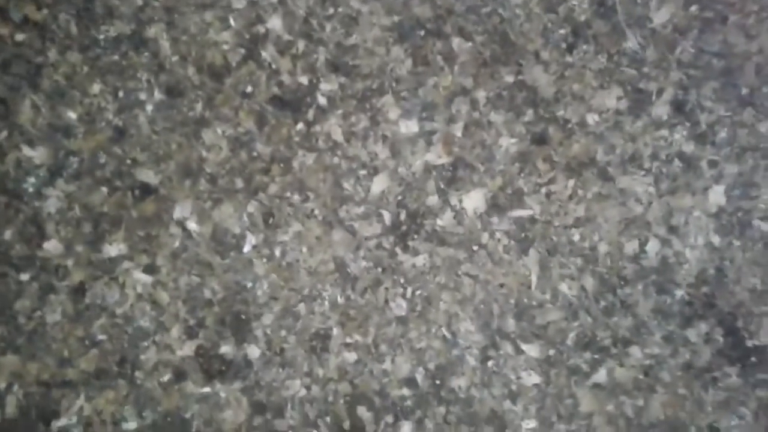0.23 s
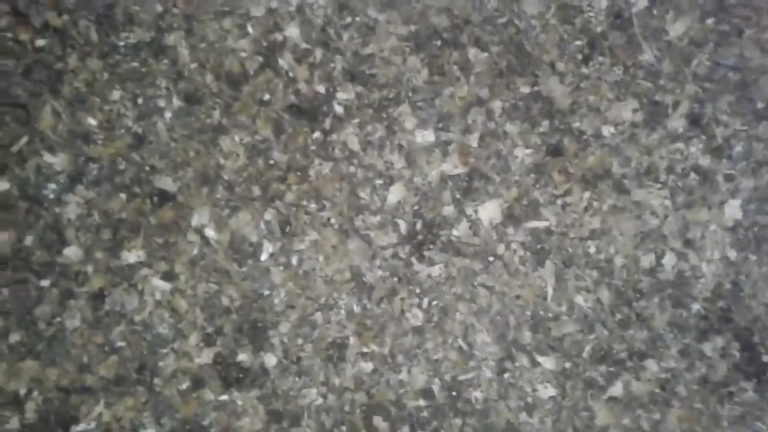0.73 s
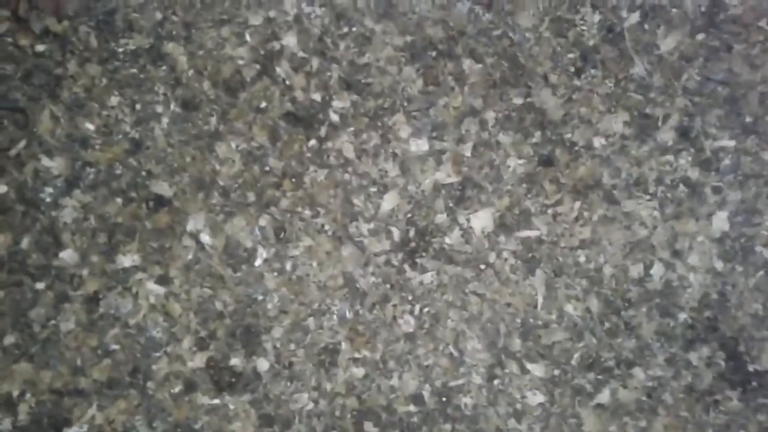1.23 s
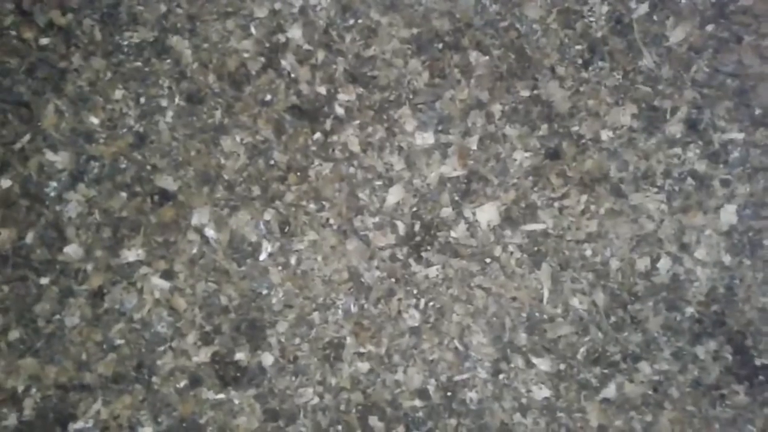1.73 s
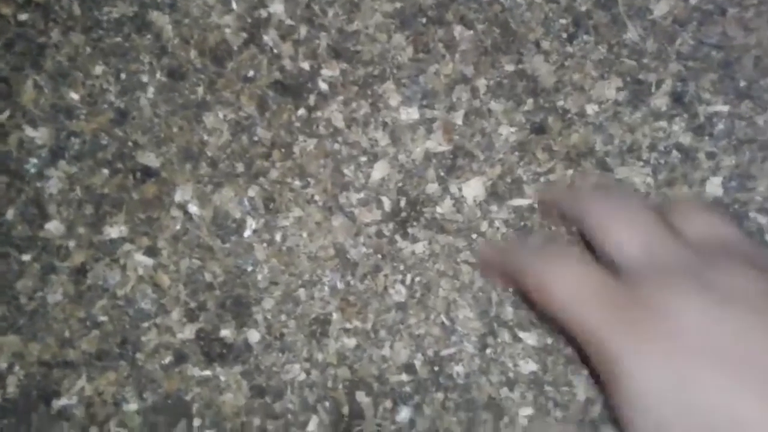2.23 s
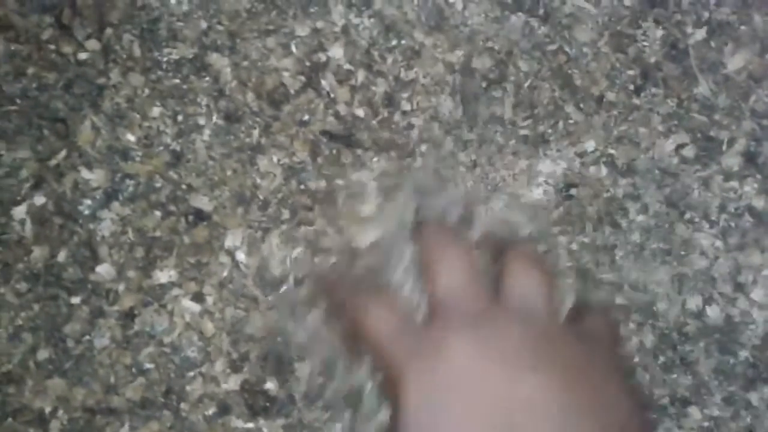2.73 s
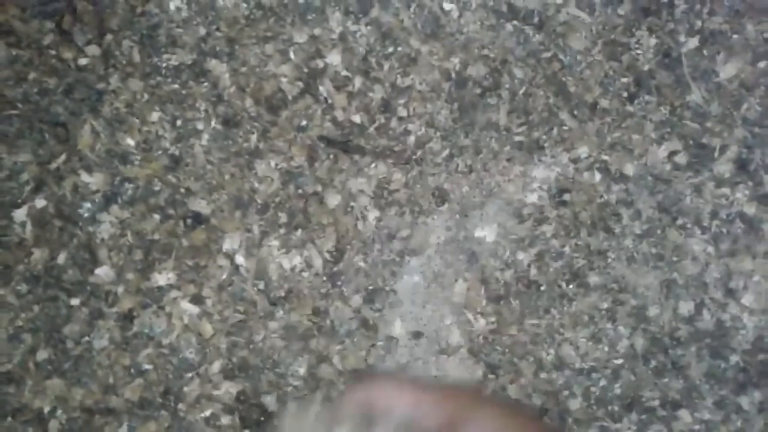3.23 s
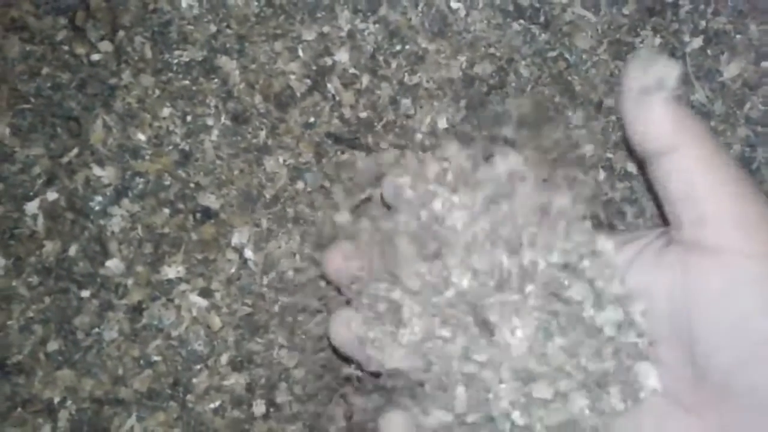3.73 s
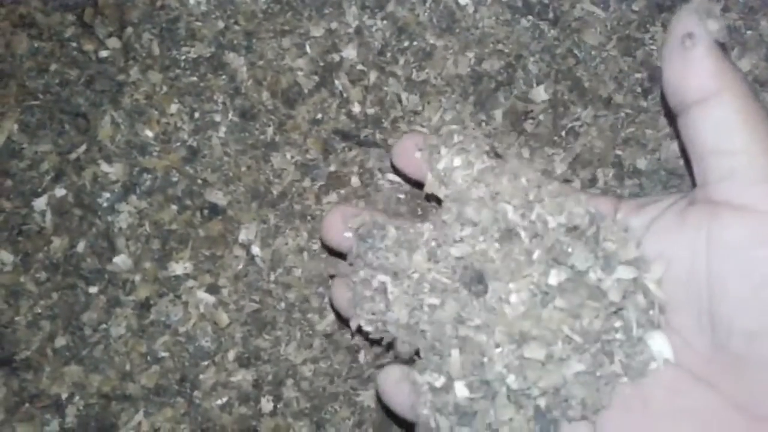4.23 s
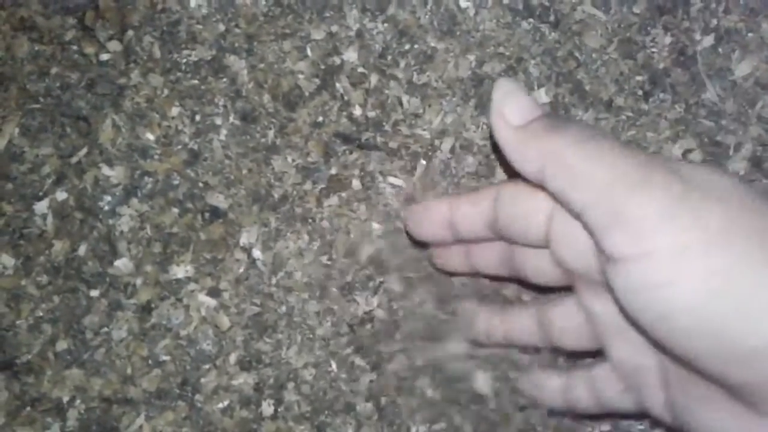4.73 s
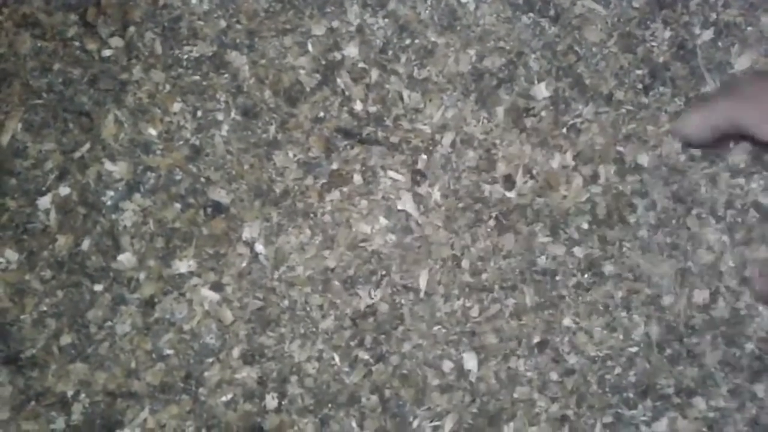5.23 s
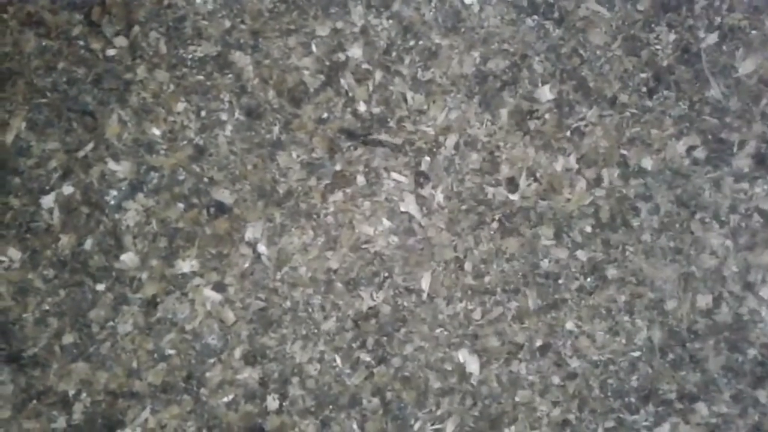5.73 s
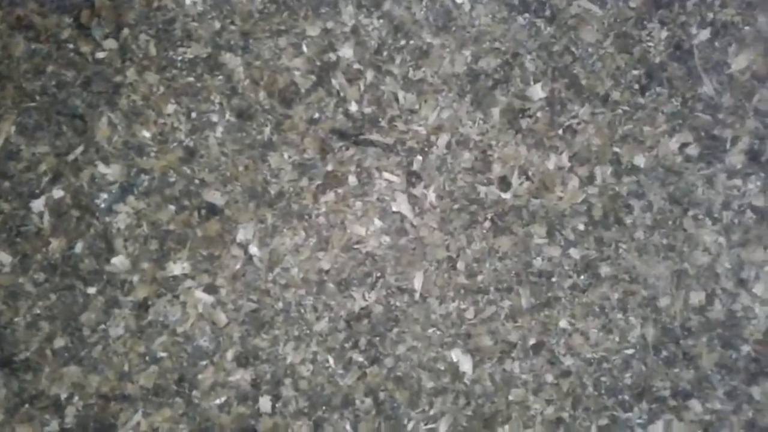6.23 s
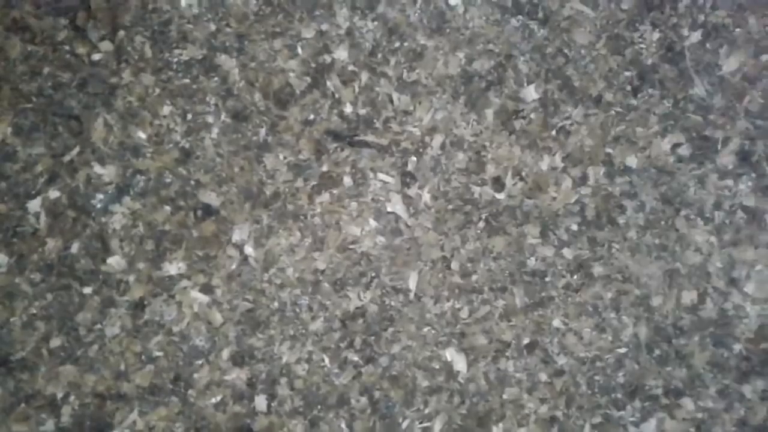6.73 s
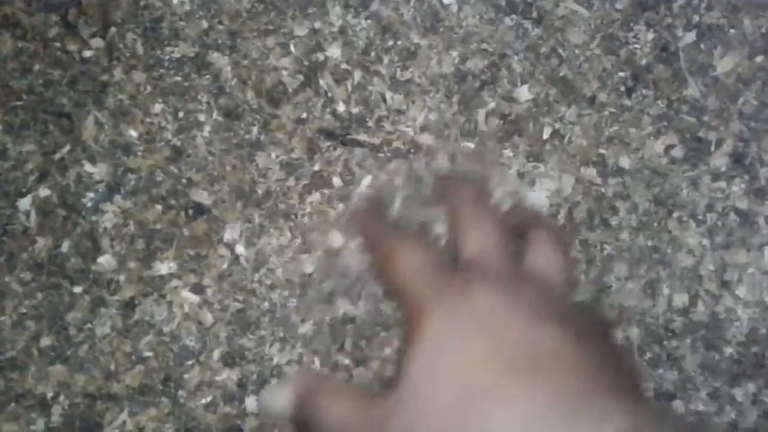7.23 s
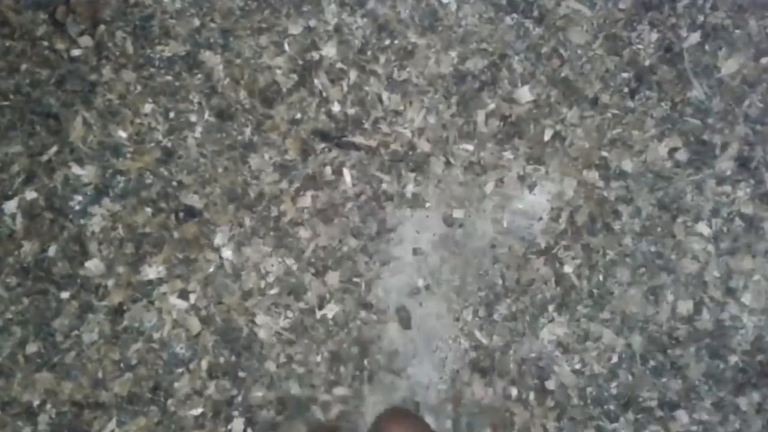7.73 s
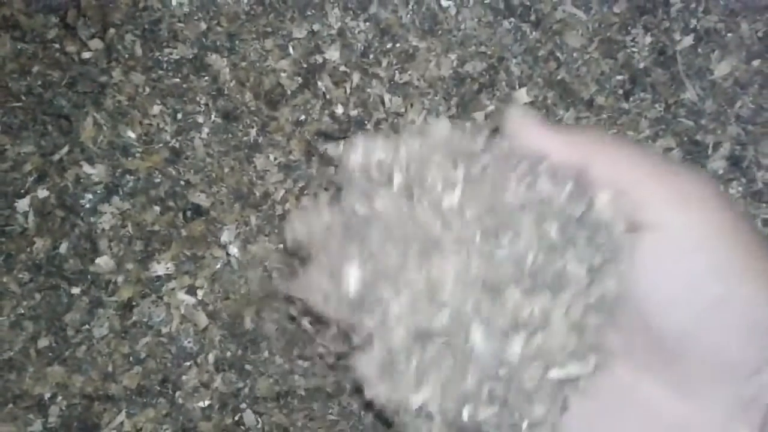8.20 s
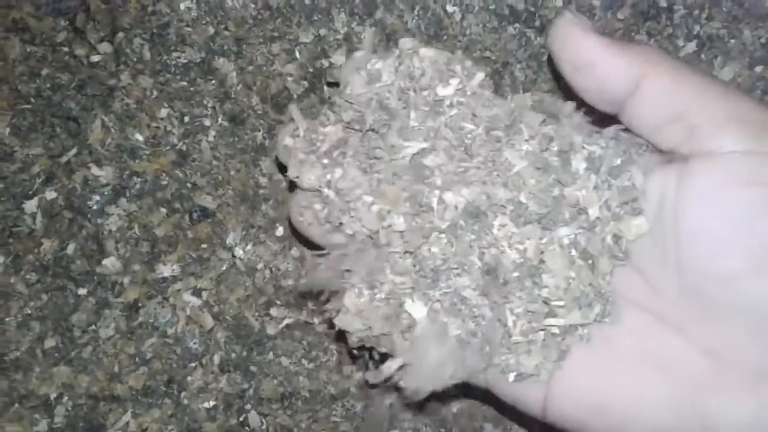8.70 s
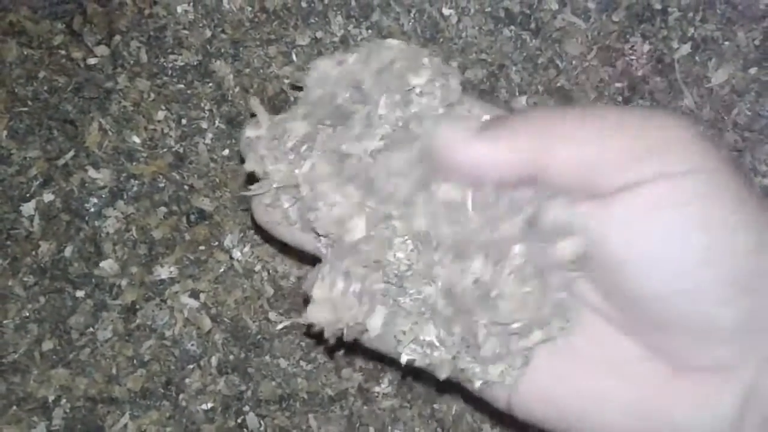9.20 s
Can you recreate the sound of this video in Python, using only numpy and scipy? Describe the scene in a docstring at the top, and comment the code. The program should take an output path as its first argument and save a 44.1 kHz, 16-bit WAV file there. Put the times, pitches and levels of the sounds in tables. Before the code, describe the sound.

Big ventilation fans throb and whirr steadily in a closed poultry shed while many young chickens peep, squeal and trill, with faint ticks of dry litter.

```python
"""Closed poultry shed with fans and chickens

Inside the shed, big fans throb as blade tones of nearly equal pitch beat, over hum, whirr and rushing air.
Close to the microphone young chickens peep, cry, squeal and trill: swept whistles, some shaken or dipping.
A few steps away others peep softly, and the distant flock merges into a wash of calls and shaped noise.
A hand scoops dry litter: crumbs patter and a few flakes tick as short bursts of bright noise.
Near calls are dulled above 3 kHz but for a band near 5 kHz; the microphone adds faint hiss and whines."""
import sys
import numpy as np
from scipy import signal
from scipy.fft import rfft, irfft
from scipy.io import wavfile
from scipy.ndimage import uniform_filter1d

SR = 44100
rng = np.random.default_rng(int(sys.argv[2]) if len(sys.argv) > 2 else 0)


def dump(signal):
    """Clip the signal to [-1, 1] and save it as 16-bit WAV at the path in sys.argv[1]."""
    limited = np.clip(np.atleast_2d(signal).T, -1, 1)
    pcm = np.round(limited * 32767).astype(np.int16)
    wavfile.write(sys.argv[1], SR, pcm)


N = 417186
TIME, BINS = np.arange(N) / SR, np.fft.rfftfreq(N, 1 / SR)  # sample times [s], spectrum bins [Hz]

# All levels are relative; the functions add their own gains.
# blade tones of five fans at nearly the same speed: (pitch [Hz], level [dB])
FAN_BLADES = [(42.935, -23.4), (42.72, -29.5), (41.31, -28.7), (41.025, -36), (38.81, -30.5)]
IN_STEP_S = 4.55  # moment when all blade tones are in phase [s]
# slow swell of the blade tones: (time [s], level [dB])
BLADE_SWELL = [(0, -1.5), (2.0, -0.5), (2.6, 5.5), (3.2, 1.5), (5.5, -3.5), (6.3, 2), (7, -0.5),
               (7.7, -2.5), (8.2, 0.5), (8.8, 1.5), (9.46, -2.5)]
# spectrum of the air buffeting around the blades: (frequency [Hz], density [dB per Hz])
BUFFET_SPECTRUM = [(12, -30), (30, -19), (38, -7.5), (42, 19), (45, -23), (52, -24), (120, -120)]
HUM_HZ = 82.05  # octave of the blade tones
# hum that comes and goes: (time [s], level [dB])
HUM_SWELL = [(0, -39), (.9, -25), (1.3, -46), (1.9, -27.5), (2.4, -23.5), (2.9, -38.5), (3.8, -24.5),
             (4.4, -30.5), (4.8, -23.5), (5.45, -25), (6, -33), (7.1, -26.5), (7.9, -43), (8.6, -20.5),
             (9, -30), (9.46, -24)]
# two close tones of the motors' whirr: (pitch [Hz], width [Hz], level [dB])
WHIRR_TONES = [(769.5, 26, -38), (790, 20, -40)]
# swell of the whirr: (time [s], level [dB])
WHIRR_LEVEL = [(0, -2.5), (1.5, 2.5), (2.38, -9), (2.55, 6.5), (2.75, -5.5), (3.4, 2), (4.45, -0.5),
               (4.63, 5.5), (4.85, 0), (5.4, 3), (5.7, -3), (6.8, 0.5), (7.1, 2), (8.5, 1), (8.72, 7.5),
               (9, 3), (9.46, 0.5)]
# tones of fans, motors and housings: (pitch [Hz], width [Hz], level [dB])
HOUSING_TONES = [(100.6, 2.9, -40.5), (118.5, 2, -35), (159.4, 2, -40), (312.2, 10.15, -46),
                 (494, 10, -44.5), (586.3, 6.26, -45.5), (662.5, 8.4, -49.5), (949, 14, -45),
                 (998, 8.02, -43), (1060, 5.5, -48.5), (1056, 14.2, -58), (1203, 7.94, -47),
                 (1317, 16.6, -47), (1479, 24, -51.5), (1540, 4.75, -54)]
# strength of the air stream: (time [s], level [dB])
AIR_STREAM = [(0, -25.5), (2.2, -27), (2.7, -25.5), (4.7, -26), (6.2, -26.5), (8.8, -25)]
# spectrum of the low rumble of moved air: (frequency [Hz], density [dB per Hz])
RUMBLE_SPECTRUM = [(12, -36), (25, -46), (36, -13), (55, -4.5), (75, -1), (100, 0), (132, 0), (165, -5.5),
                   (195, -8), (240, -12), (290, -20), (400, -50), (700, -91)]
# spectrum of the rush of moved air: (frequency [Hz], density [dB per Hz])
RUSH_SPECTRUM = [(120, -39), (270, -8.5), (338, -7), (370, -3.5), (620, -4), (860, -2.5), (1000, 0.5),
                 (1190, -4), (1380, -11.5), (1600, -14), (2100, -16), (2500, -19), (2900, -33), (3400, -41),
                 (4500, -64)]

# near peeps: (time [s], length [s], middle pitch [Hz], fall [octaves], level [dB])
NEAR_PEEPS = [(0.436, 0.045, 2480, 0.19, -34), (0.666, 0.036, 2045, .12, -33),
              (1.297, .035, 1850, 0.16, -33), (1.362, .028, 2200, .1, -35), (1.526, 0.052, 2430, 0.21, -32),
              (1.665, 0.03, 1415, 0.11, -30), (1.941, 0.043, 1950, 0.36, -29),
              (2.052, .024, 2460, .05, -35), (2.407, 0.032, 2300, .52, -29),
              (2.519, 0.032, 1970, 0.23, -32), (2.56, 0.035, 2090, 0.13, -31),
              (2.684, 0.032, 1907, 0.43, -26.5), (2.965, .02, 2780, .08, -44),
              (3.031, .024, 2200, .28, -32), (3.168, .05, 2210, 0.19, -34), (3.376, 0.023, 2360, 0.28, -34),
              (3.458, 0.046, 2840, 0.15, -39), (3.51, .02, 1775, .15, -34), (3.536, 0.02, 2010, .2, -29),
              (3.823, 0.026, 2330, 0.29, -32), (3.829, .028, 1730, .05, -30), (3.968, .022, 1930, .15, -38),
              (4.038, 0.03, 2440, 0.33, -33), (4.048, 0.032, 1683, 0.21, -27),
              (4.083, 0.012, 1570, .1, -27), (4.169, .016, 1450, .05, -28), (4.236, 0.026, 1910, 0.16, -23),
              (4.248, 0.038, 2145, 0.019, -29), (4.369, 0.032, 1327, 0.11, -24),
              (4.44, 0.024, 2224, .06, -32), (4.59, .024, 1990, .1, -31), (4.914, .03, 1350, .12, -29),
              (5.156, .026, 1414, .1, -31), (5.995, 0.024, 1830, .2, -30), (6.152, .025, 1880, 0.29, -27.5),
              (6.3, 0.03, 1854, 0.29, -25), (6.495, .05, 2850, 0.25, -46), (7.09, .035, 2780, 0.26, -42.5),
              (7.245, .025, 3020, .12, -44), (7.428, 0.047, 1814, 0.19, -32.5),
              (7.609, 0.015, 2190, 0.2, -31), (7.849, .02, 2170, 0.25, -29.5),
              (7.905, 0.019, 2600, .05, -30), (8.099, 0.049, 1860, 0.22, -31),
              (8.143, 0.016, 1890, 0.1, -25), (8.267, 0.026, 1870, 0.24, -28),
              (8.363, 0.036, 2650, 0.22, -41), (8.85, 0.02, 1560, .2, -28)]
PEEP_EASE = 0.17  # how much a peep's fall flattens towards its end
# hoarse squeals, mostly near, a few from farther off: (time [s], length [s], pitch [Hz], pitch scatter [Hz],
# level [dB])
HOARSE_SQUEALS = [(2.686, 0.091, 2120, 300, -40.5), (3.814, 0.073, 2360, 180, -41),
                  (4.043, 0.03, 1686, 130, -31), (4.228, 0.095, 2030, 200, -34),
                  (4.362, 0.045, 1410, 110, -35), (7.917, 0.025, 1990, 90, -32.5),
                  (8.134, .028, 2020, 190, -36), (8.895, 0.028, 1990, 171, -33),
                  (8.985, 0.035, 2020, 150, -35), (7.885, .075, 2890, 200, -39),
                  (7.993, .056, 2764, 160, -38.5), (4.44, 0.041, 2180, 130, -40)]
# closest cries that arch, slide down or swoop, one list each: (time [s], pitch [Hz], level [dB])
NEAR_CRIES = [
    [(3.062, 2950, -42), (3.078, 3050, -48), (3.093, 2650, -41), (3.102, 2370, -29), (3.122, 2110, -26),
     (3.138, 2060, -27), (3.162, 1660, -33)],
    [(3.267, 2150, -29), (3.28, 2870, -41), (3.297, 2850, -42), (3.31, 2390, -28), (3.327, 1730, -27)],
    [(3.706, 2020, -29), (3.732, 2620, -38), (3.743, 2320, -30), (3.768, 2080, -25), (3.785, 1970, -29),
     (3.796, 1660, -32)],
    [(3.868, 2320, -35), (3.882, 2190, -29), (3.897, 1920, -35), (3.909, 1750, -28), (3.932, 1740, -34)],
    [(4.762, 1370, -24), (4.784, 1500, -17.5), (4.808, 1420, -25), (4.835, 1280, -27)],
    [(8.359, 3900, -41), (8.369, 3420, -46), (8.376, 1700, -42), (8.386, 1390, -24), (8.391, 1250, -23),
     (8.396, 1720, -34), (8.406, 1780, -31)],
    [(8.506, 4350, -32), (8.522, 3500, -43), (8.535, 2930, -46), (8.553, 2440, -37), (8.568, 2080, -26),
     (8.606, 1860, -22), (8.62, 1540, -28), (8.636, 1470, -24)],
    [(8.949, 2860, -33), (8.967, 2120, -22), (8.974, 1750, -21), (8.982, 1675, -24), (8.99, 2110, -25),
     (8.998, 2350, -30)],
    [(8.962, 1500, -33), (8.97, 2050, -28), (8.977, 2700, -30)],
]
# trills near and far: (time [s], length [s], upper pitch [Hz], dip depth [Hz], dip rate [per s],
# level [dB], echo over direct sound [dB])
TRILL_CALLS = [(3.66, 0.06, 2260, 230, 33, -32, -7), (4.949, 0.118, 2200, 320, 36, -31.5, -10),
               (7.872, .062, 3020, 380, 33, -35, -3), (7.914, 0.048, 3230, 330, 48, -36.5, -3),
               (7.982, 0.105, 2930, 300, 45, -40.5, -1), (8.598, .232, 2460, 380, 43.3, -28.8, -12),
               (9.11, .05, 2620, 220, 44, -40, -4), (9.388, .05, 2620, 200, 44, -36, -4)]
TRILL_SAG, TRILL_DEEPEN = 0.08, 0.65  # shares by which the pitch sinks and the dips deepen over a trill
# tone of the near calls and trills, dulled above 3 kHz, with a bright band near 5 kHz:
# (frequency [Hz], gain [dB])
CALL_TONE = [(2900, 0.5), (3200, -6.5), (3500, -7.5), (4000, -22), (4900, -4), (6000, -42)]

# ticks of falling litter flakes: (time [s], level [dB], lower edge [Hz])
FLAKE_TICKS = [(2.685, -47, 5000), (3.271, -51, 5000), (4.147, -48, 7000), (4.21, -49.1, 7000),
               (4.232, -51, 2500), (4.254, -52, 2500), (4.277, -51, 3000), (4.296, -48, 5000),
               (4.363, -41, 4200), (9.037, -46, 6500), (9.114, -44, 5000)]
# colour of the ticks: (frequency [Hz], gain [dB])
FLAKE_COLOUR = [(1500, -4), (3500, 11), (5500, 9), (8000, 8.5), (10500, 10), (12000, -6), (16000, -33)]
# litter sliding off the palm: (time [s], level [dB])
PALM_RUSTLE = [(4.19, -90), (4.23, -58), (4.26, -56), (4.3, -61), (4.36, -77), (4.42, -90)]
# colour of that rustle: (frequency [Hz], density [dB per Hz])
PALM_COLOUR = [(1500, -13), (2800, 3), (3600, 9), (5000, -3), (10000, -18), (14000, -35)]

# spectrum of the distant flock: (frequency [Hz], density [dB per Hz])
FLOCK_SPECTRUM = [(1000, -52), (1600, -1.5), (2000, 0.5), (2300, 1), (2600, -5.5), (2900, -8.5),
                  (3200, -17), (3700, -30.5), (5000, -62)]
# the flock settles a little after two seconds: (time [s], level [dB])
FLOCK_SWELL = [(0, -36.5), (2.05, -36), (2.3, -39), (3.8, -38), (4.7, -40), (6.6, -39), (9.46, -38.5)]

# spectrum of the microphone hiss: (frequency [Hz], density [dB per Hz])
HISS_SPECTRUM = [(1500, -17), (4000, -1), (6200, -3.5), (7600, -1.5), (8600, 0.5), (11000, -3), (12200, -9),
                 (13500, -23), (16000, -25)]
# strength of the hiss: (time [s], level [dB])
HISS_SWELL = [(0, -58.5), (2.15, -58.5), (2.6, -62.1), (5.1, -63.5), (5.8, -61.5), (9.46, -63)]
# thin whines of the microphone: (pitch [Hz], width [Hz], level [dB])
MIC_WHINES = [(7234, 8, -83), (10870, 70, -86), (14500, 50, -87)]
# noise of opposite sign in the two channels: (frequency [Hz], density [dB per Hz])
WIDTH_SPECTRUM = [(30, -3), (86, -11), (200, -18), (300, -1), (730, -6.5), (1250, -3.5), (2170, -1),
                  (2870, -6.5), (3430, -27), (4500, -30)]
EDGE_HZ = 15400  # upper band limit


def fans(buffet_db=-29, rumble_db=-22.0, rush_db=-1.0, gust_db=0.65):
    """Blade tones beat into a throb, with hum, motor tones, and the rumble and rush of driven air."""
    start = rng.random()  # shared phase [turns]
    blades = np.zeros(N)
    for hz, db in FAN_BLADES:
        blades += amp(db) * unit(np.sin(2 * np.pi * (hz * (TIME - IN_STEP_S) + start)))
    throb = follow(BLADE_SWELL) * blades + amp(buffet_db) * noise(BUFFET_SPECTRUM)
    hum = follow(HUM_SWELL) * tones([(HUM_HZ, 3, 0)], flutter=0.13)
    whirr = follow(WHIRR_LEVEL) * tones(WHIRR_TONES, flutter=0.96)
    housings = unit(follow(AIR_STREAM)) * tones(HOUSING_TONES, flutter=0.78)
    rumble = amp(rumble_db + gust_db * drift(9.1)) * noise(RUMBLE_SPECTRUM)
    rush = amp(rush_db) * follow(AIR_STREAM) * noise(RUSH_SPECTRUM)
    return throb + hum + whirr + housings + rumble + rush


def near_birds(peeps_db=-1.5):
    """The chickens closest to the microphone peep, squeal and cry; a few farther birds squeal hoarsely too."""
    out = np.zeros(N)
    for s, length, hz, fall, db in NEAR_PEEPS:
        add(out, s, amp(db + peeps_db) * peep(length, hz, fall))
    for s, length, hz, scatter_hz, db in HOARSE_SQUEALS:
        add(out, s, amp(db) * squeal(length, hz, scatter_hz))
    for curve in NEAR_CRIES:
        add(out, *cry(curve))
    return colour(out, CALL_TONE)


def peep(length, hz, fall):
    """A short whistle falls through its pitch, quickly at first and then more gently."""
    u = np.linspace(-.5, .5, max(int(length * SR), 64))
    pitch = hz * 2 ** (fall * (PEEP_EASE * u ** 2 - u))
    return signal.windows.tukey(len(u), .5) * whistle(pitch)


def squeal(length, hz, scatter_hz, shake_hz=330):
    """In a strained call, fast uneven shaking of the pitch breaks the whistle into a band."""
    size = max(int(length * SR), 64)
    band = signal.butter(2, [shake_hz / 2, shake_hz], "band", fs=SR, output="sos")
    shakes = signal.sosfilt(band, rng.standard_normal((2, SR // 4)))
    pitch_shake, level_shake = shakes[:, -size:]  # the end, where the filter has settled
    phase = 2 * np.pi * np.cumsum(hz + scatter_hz * unit(pitch_shake)) / SR
    call = unit((1 + unit(level_shake)) * voice(phase))
    return call * signal.windows.tukey(size, .5)


def cry(curve):
    """A whistle bends in pitch and strength along the curve; returned with its start [s]."""
    s, hz, db = np.transpose(curve)
    t = np.arange(s[0], s[-1], 1 / SR)
    call = amp(np.interp(t, s, db)) * whistle(np.interp(t, s, hz))
    return s[0], call * signal.windows.tukey(len(t), .2)


def whistle(hz, overtone_db=-22, quaver=0.012, quaver_hz=70):
    """A nearly pure tone follows a pitch line with a slight quaver."""
    t = TIME[:len(hz)]
    hz = hz * (1 + quaver * np.sin(2 * np.pi * (quaver_hz * t + rng.random())))
    phase = 2 * np.pi * np.cumsum(hz) / SR
    overtone = amp(overtone_db) / (1 + (hz / 1500) ** 10)  # fades out on high calls
    return np.sin(phase) + overtone * np.sin(2 * phase)


def voice(phase, overtone_db=-28):
    """A strained voice sounds the note and its octave."""
    return np.sin(phase) + amp(overtone_db) * np.sin(2 * phase)


def trills():
    """Birds trill near and far, blurred by the shed's echoes."""
    direct, echo = np.zeros((2, N))
    for s, length, top_hz, depth_hz, rate, db, echo_db in TRILL_CALLS:
        call = amp(db) * trill(length, top_hz, depth_hz, rate)
        add(direct, s, call)
        add(echo, s, amp(echo_db) * call)
    return colour(direct + shed(echo), CALL_TONE)


def trill(length, top_hz, depth_hz, rate, dip_db=8.5, jitter=0.011, shimmer_db=1.5, ease_s=.018):
    """A slightly hoarse voice dips sharply in pitch at an even pace, loudest in the dips."""
    u = np.linspace(-.5, .5, int(length * SR))
    knots = np.linspace(-.5, .5, 48)
    shake, shimmer = (np.interp(u, knots, v) for v in rng.standard_normal((2, 48)))
    dip = (1 - abs(np.cos(np.pi * rate * TIME[:len(u)]))) ** 1.4
    top = top_hz * (1 - TRILL_SAG * u + jitter * shake)
    hz = top - depth_hz * (1 + TRILL_DEEPEN * u) * dip
    level = amp(dip_db * (dip - .5) + shimmer_db * shimmer)
    ease = signal.windows.tukey(len(u), 2 * ease_s / length)
    return level * voice(2 * np.pi * np.cumsum(hz) / SR) * ease


def litter(ticks_db=12, decay_s=0.002, crumbs_per_s=500, spread_db=4):
    """Litter slides off the hand as a patter of crumbs, and single dry flakes land with a tiny snap."""
    t, ticks = np.arange(SR // 50) / SR, np.zeros(N)
    for s, db, edge_hz in FLAKE_TICKS:
        snap = rng.standard_normal(len(t)) * np.exp(-t / decay_s)
        thin = signal.butter(2, edge_hz, "high", fs=SR, output="sos")
        add(ticks, s, amp(db + ticks_db) * signal.sosfilt(thin, snap / np.linalg.norm(snap)))
    landing = rng.random(N) < crumbs_per_s / SR
    weight = amp(spread_db * np.minimum(rng.exponential(1, N), 3))
    crumbs = rng.choice([-1, 1], N) * weight * landing
    rustle = follow(PALM_RUSTLE) * unit(colour(crumbs, PALM_COLOUR))
    return colour(ticks, FLAKE_COLOUR) + rustle


def neighbours(count=150, level_db=-42.0, low_hz=1650, range_hz=1000, length_s=0.0343, fall=0.28,
               echo_db=-7, treble_db=-7, distance_db=5):
    """Birds a few steps away drop in soft, echoing peeps at random, the higher and farther ones fainter."""
    out = np.zeros(N)
    for when, size, pitch, steep, near in rng.random((count, 5)):
        call = peep(length_s * (.5 + size), low_hz + range_hz * pitch, fall * (.5 + steep))
        level = amp(treble_db * (pitch - .5) + distance_db * (near - .5))
        add(out, when * N / SR, level * call)
    return amp(level_db) * (out + amp(echo_db) * shed(out))


def flock(count=700, calls_db=-5.0, wash_db=-7.5, spread_db=8, low_hz=1720, range_hz=1200):
    """Hundreds of farther birds peep over the wash of noise into which the rest merge."""
    calls = np.zeros(N)
    for when, length, pitch, fall, near in rng.random((count, 5)):
        call = peep(0.0257 + 0.05 * length, low_hz + range_hz * pitch, 0.148 + 0.42 * fall)
        add(calls, when * N / SR, amp(spread_db * near) * call)
    calls = unit(colour(calls + shed(calls), FLOCK_SPECTRUM))
    return follow(FLOCK_SWELL) * (amp(calls_db) * calls + amp(wash_db) * noise(FLOCK_SPECTRUM))


def shed(x, t60=0.2):
    """Scattered echoes from roof and walls fall by 60 dB in t60 seconds, soaked up by the litter."""
    t = np.arange(SR // 2) / SR
    sparse = (rng.random(len(t)) < .05) * (t > .004)
    taps = rng.standard_normal(len(t)) * sparse * amp(-60 * t / t60)
    return signal.fftconvolve(x, taps / np.linalg.norm(taps))[:N]


def hiss(waver_db=1.4):
    """Faint microphone noise wavers slightly in level."""
    return amp(waver_db * drift(24)) * follow(HISS_SWELL) * noise(HISS_SPECTRUM)


def tones(rows, flutter):
    """Tones waver at random in pitch and strength, faster the wider they are."""
    out, coarse = np.zeros(N), TIME[::64]
    for hz, width, db in rows:
        span = max(int(SR / 64 / width), 1)
        chance = rng.standard_normal((2, len(coarse)))
        waver, swell = (unit(uniform_filter1d(v, span)) for v in chance)
        turns = np.cumsum(hz + .5 * width * np.interp(TIME, coarse, waver)) / SR
        strength = np.interp(TIME, coarse, 1 + flutter * swell)
        out += amp(db) * unit(strength * np.sin(2 * np.pi * turns))
    return out


def noise(points):
    """Noise of rms 1 with the given spectrum."""
    return unit(colour(rng.standard_normal(N), points))


def drift(rate):
    """Slow chance of rms 1, moving up to about rate times a second."""
    return unit(irfft(rfft(rng.standard_normal(N)) * np.exp(-(BINS / rate) ** 2), N))


def colour(x, points):
    """Filters by a spectrum of rows (frequency [Hz], level [dB])."""
    hz, db = np.transpose(points)
    gain = amp(np.interp(np.log(BINS + 1), np.log(hz), db))
    return irfft(rfft(x) * gain, N)


def follow(curve):
    """Gain at every sample from rows (time [s], level [dB])."""
    return amp(np.interp(TIME, *np.transpose(curve)))


def amp(db):
    """Decibels to gain."""
    return 10 ** (np.asarray(db) / 20)


def unit(x):
    """Scales to rms 1."""
    return x / np.sqrt(np.mean(x ** 2) + 1e-30)


def add(mix, s, sound):
    """Mixes a sound in at time s [s]."""
    part = mix[max(round(s * SR), 0):][:len(sound)]
    part += sound[:len(part)]


def scene(echo_db=-12):
    """Fans, birds and litter, alike in both channels."""
    birds = near_birds() + neighbours()
    mix = fans() + birds + amp(echo_db) * shed(birds) + trills() + litter() + flock()
    return np.array([mix, mix])


def record(dry, hiss_db=-1, side_db=-55.5, hiss_side_db=-9):
    """The microphone adds hiss, whines and a trace of width; then brief end fades and the band limit."""
    side = amp(side_db) * noise(WIDTH_SPECTRUM) + amp(hiss_db + hiss_side_db) * hiss()
    wet = dry + amp(hiss_db) * hiss() + tones(MIC_WHINES, flutter=.5)
    wet = wet + np.array([[1], [-1]]) * side
    wet = wet * signal.windows.tukey(N, .0012)
    lowpass = signal.firwin(511, EDGE_HZ, window=("kaiser", 9), fs=SR)
    return signal.oaconvolve(wet, lowpass[None], "same")


dry = scene()
out = record(dry)
dump(out)
```